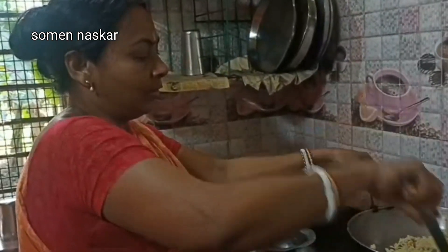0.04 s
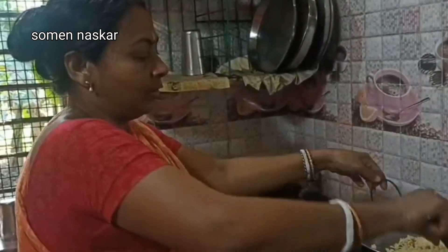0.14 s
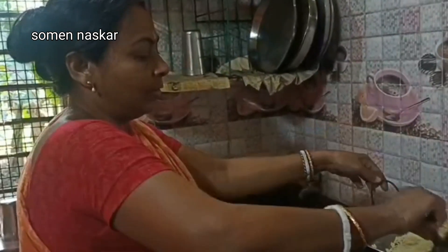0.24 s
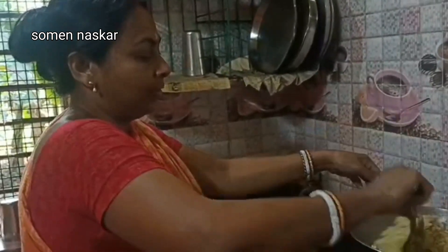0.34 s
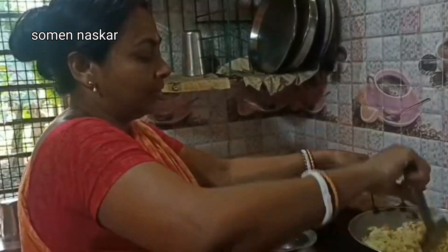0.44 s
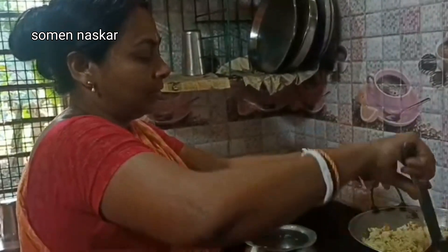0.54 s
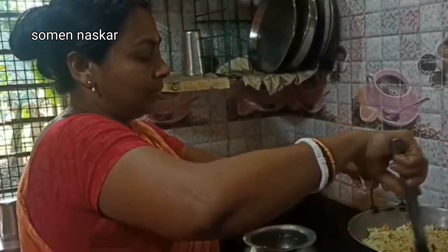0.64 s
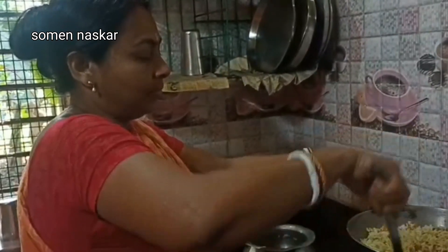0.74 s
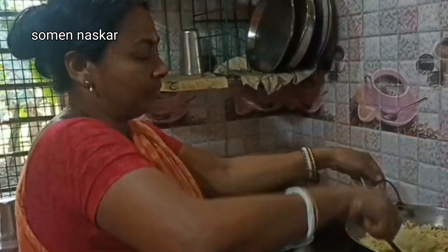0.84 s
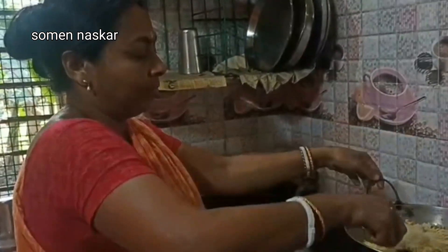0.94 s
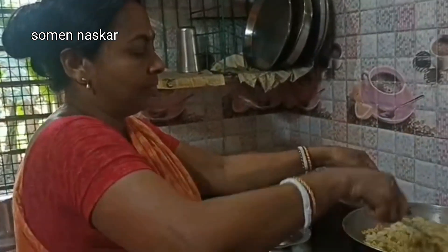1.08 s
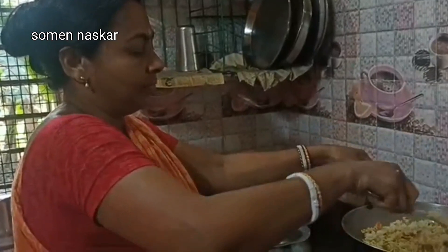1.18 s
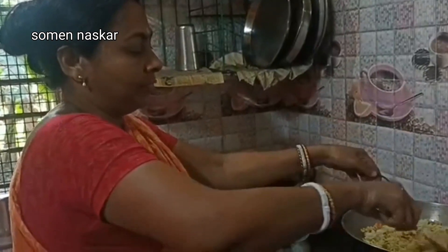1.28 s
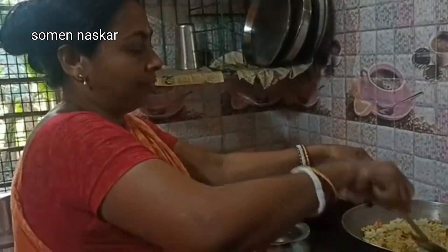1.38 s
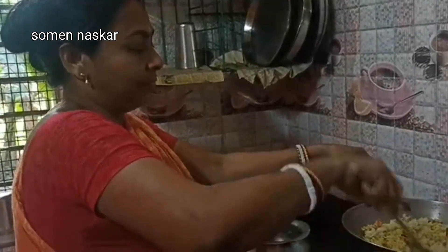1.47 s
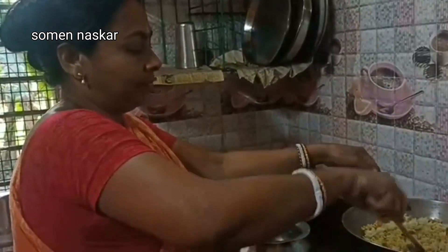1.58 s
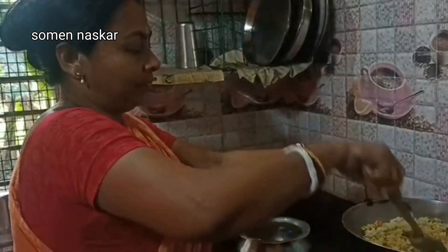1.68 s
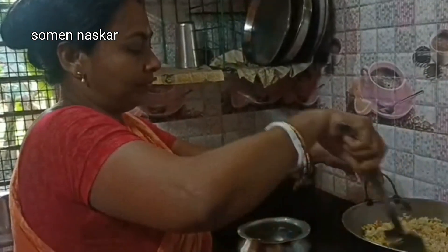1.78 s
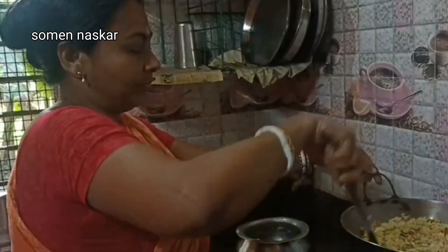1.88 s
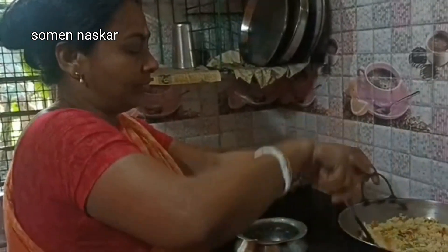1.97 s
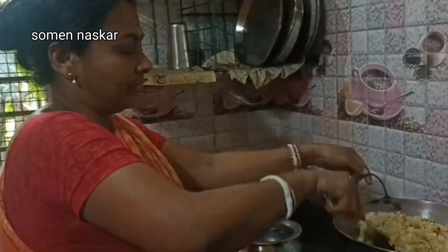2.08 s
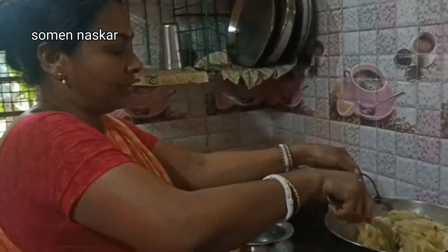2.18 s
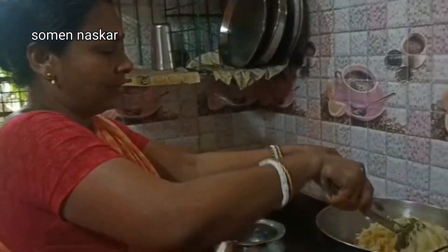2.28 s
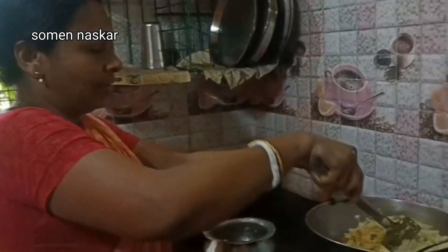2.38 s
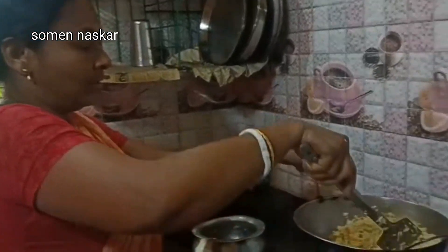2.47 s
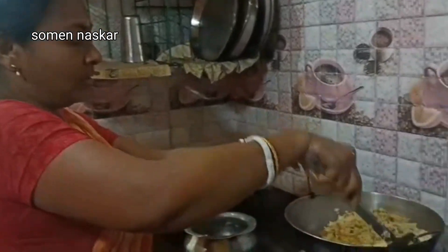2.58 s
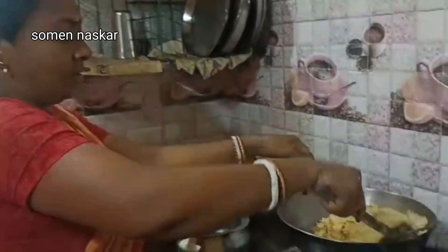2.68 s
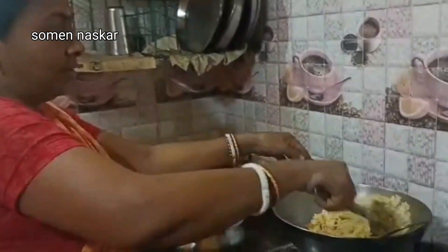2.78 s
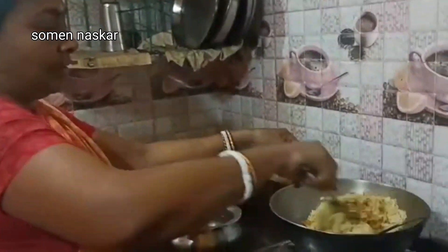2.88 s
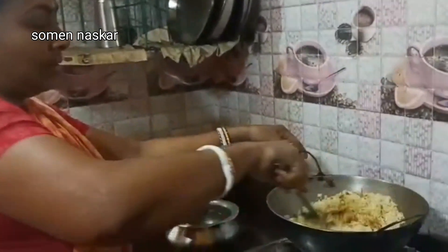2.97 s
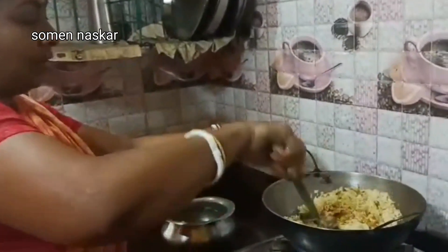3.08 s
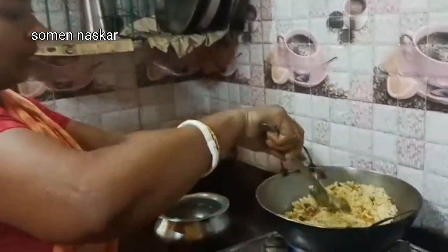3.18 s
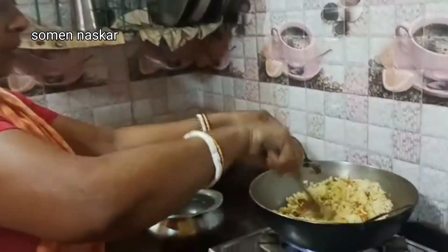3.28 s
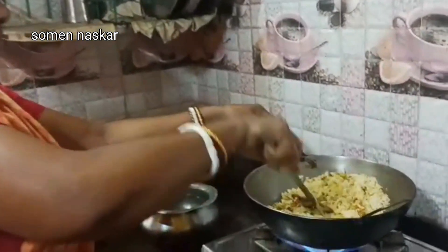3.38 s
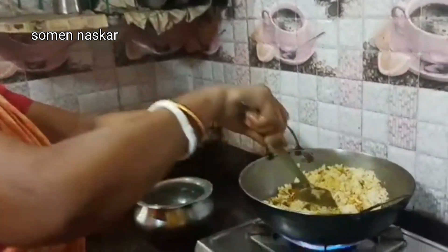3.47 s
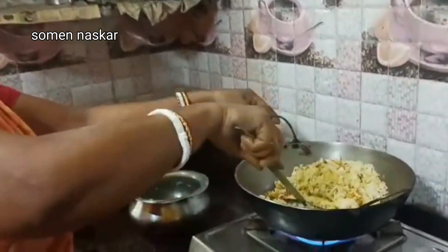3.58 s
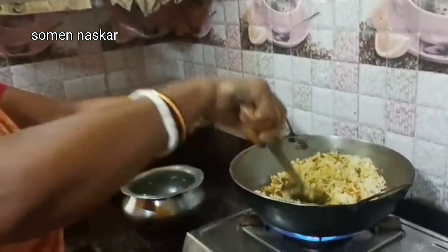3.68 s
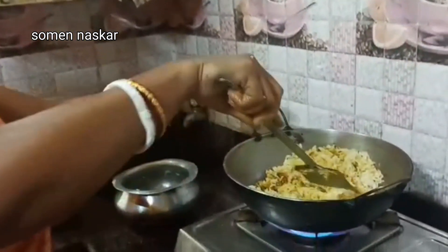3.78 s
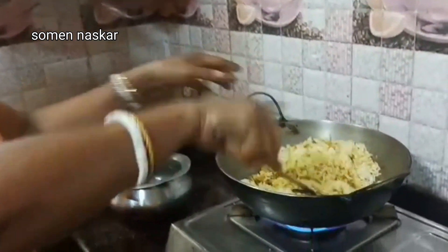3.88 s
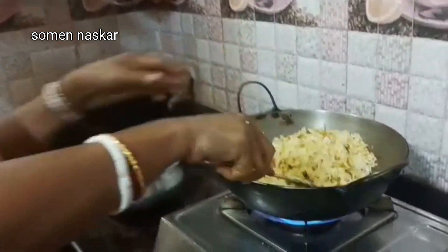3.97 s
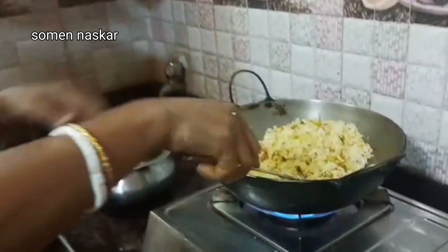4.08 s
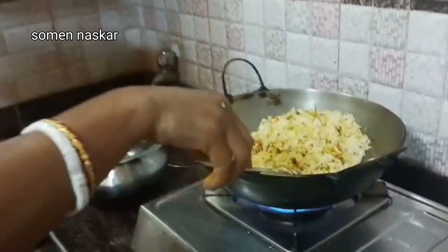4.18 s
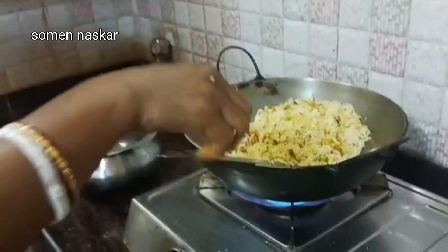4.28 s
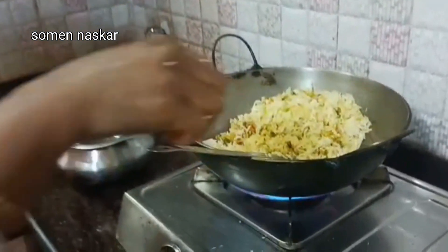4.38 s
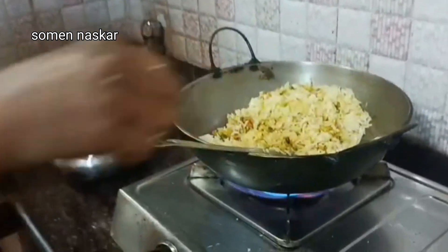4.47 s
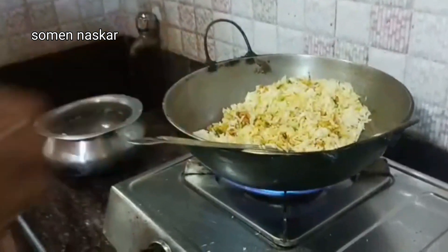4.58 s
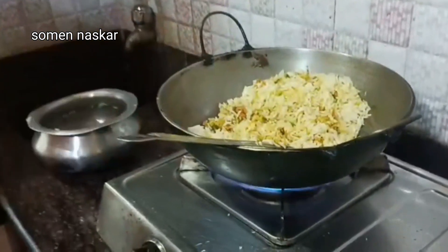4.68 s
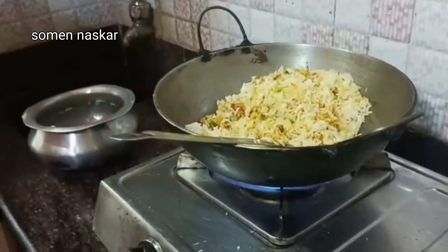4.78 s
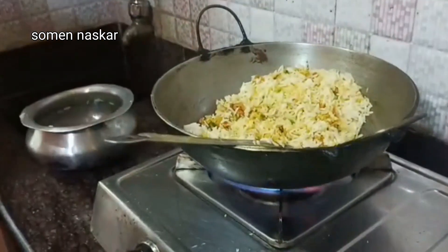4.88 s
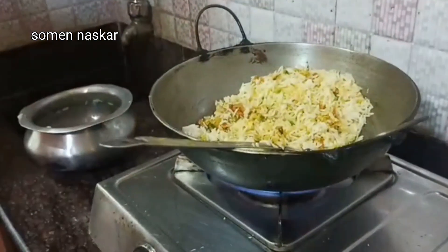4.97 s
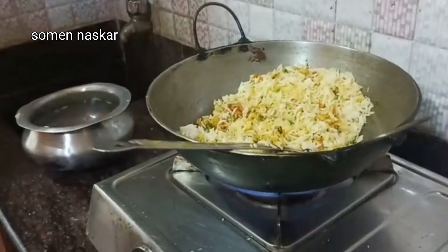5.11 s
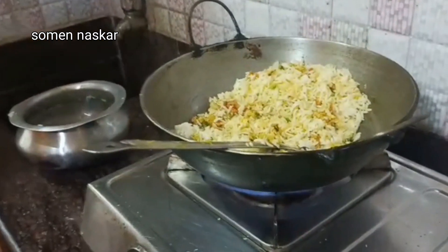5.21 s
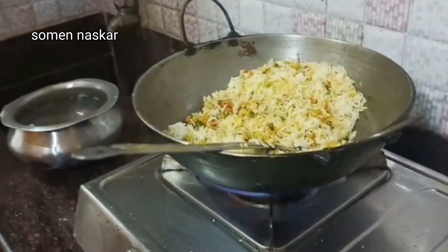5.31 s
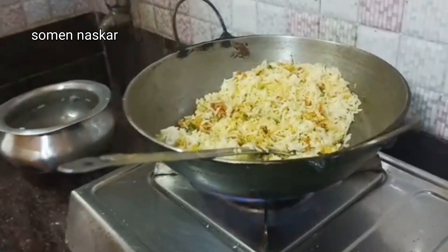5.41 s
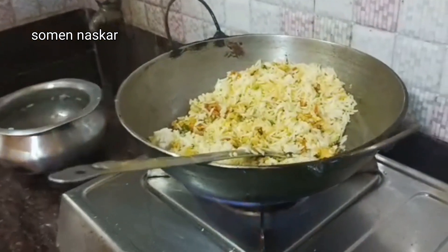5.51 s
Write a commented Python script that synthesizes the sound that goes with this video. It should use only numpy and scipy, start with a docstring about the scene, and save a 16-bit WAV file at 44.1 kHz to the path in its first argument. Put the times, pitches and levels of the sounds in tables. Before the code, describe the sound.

In a small tiled kitchen, moist rice fries with a dense, bright sizzle that swells at each turn. A steel spatula hisses along the wok and chatters against it, with the hardest clanks around the middle and a last one after four seconds. Then the sizzle thins and sputters, with sharp steam pops over a soft gas flame. One nearby microphone, mono, with short hard echoes.

```python
"""A small tiled kitchen: rice fries in a metal wok on a gas burner, over a soft flame and low hums.
The sizzle is dense random clicks, shaped by how much water meets the metal; each turn freshens it.
A steel spatula ploughs through the rice and chatters on the wok: random impacts ringing metal modes.
When the stirring stops, the sizzle thins out and sputters. Bursts of noise make the steam pops, and
narrow bands of noise make the faint steam whistles. Echoes and a short tail surround wok and spatula."""
import sys
import numpy as np
from scipy import signal
from scipy.io import wavfile
from scipy.ndimage import uniform_filter1d, minimum_filter1d

SR = 44100
rng = np.random.default_rng(int(sys.argv[2]) if len(sys.argv) > 2 else 0)


def unload_wav(signal):
    """Save mono or channel-first audio to the path in sys.argv[1] as 16-bit WAV at rate SR, clipped to [-1, 1]."""
    wavfile.write(
        sys.argv[1],
        SR,
        np.round(np.clip(np.atleast_2d(signal).T, -1, 1) * 32767).astype(np.int16),
    )


N = 244573
TIME = np.arange(N) / SR
CONTACT_TIME = np.arange(SR // 3) / SR  # time within one knock or stroke


def from_db(db):
    """Decibels to gain."""
    return 10 ** (np.asarray(db) / 20)


def evened(x):
    """Scales to an rms of 1."""
    return x / np.sqrt(np.mean(x ** 2) + 1e-20)


def unit(x):
    """Scales to an energy of 1."""
    return x / (np.linalg.norm(x) + 1e-12)


def at_level(x, db, length):
    """Gives a contact the energy of a sound at this rms level lasting this many seconds."""
    return from_db(db) * unit(x) * np.sqrt(length * SR)


def read(points, hz):
    """Reads a table on a log-frequency axis."""
    f, value = np.transpose(points)
    return np.interp(np.log(hz + 1), np.log(f + 1), value)


def add(mix, s, sound):
    """Mixes a sound in at time s."""
    part = mix[max(round(s * SR), 0):][:len(sound)]
    part += sound[:len(part)]


def colour(x, points, size=4096):
    """Causal filter with the given spectral shape, so that clicks keep their sharp fronts."""
    log_gain = np.log(from_db(read(points, abs(np.fft.fftfreq(size, 1 / SR)))))
    minimum_phase = np.exp(np.conj(signal.hilbert(log_gain)))
    taps = np.fft.ifft(minimum_phase).real[:size // 2]
    return signal.oaconvolve(x, unit(taps))[:len(x)]


def slow_noise(size):
    """Random drift of rms 1, smoothed over this many samples."""
    return evened(uniform_filter1d(rng.standard_normal(N), size=size))


def clicks(n, per_s, spread_db):
    """Random clicks of either sign: many small, a few large."""
    height = from_db(spread_db * np.minimum(rng.exponential(1, n), 3.5))
    return height * rng.choice([-1, 1], n) * (rng.random(n) < per_s / SR)


def resonate(x, hz, width):
    """A resonance at hz with steep skirts: the band is shifted to 0 Hz, smoothed twice and shifted back."""
    turn = np.exp(2j * np.pi * np.cumsum(hz * np.ones(len(x))) / SR)
    r = np.exp(-np.pi * width / SR)
    smoothed = signal.lfilter([(1 - r) ** 2], [1, -2 * r, r * r], x / turn + 1e-18)
    return (turn * smoothed).real


def breathy_tones(rows, width):
    """Narrow bands of noise that swell and fade."""
    out = np.zeros(N)
    for s, length, hz, db in rows:
        settled = resonate(rng.standard_normal(SR), hz, width)[-int(length * SR):]
        tone = evened(settled)
        add(out, s, from_db(db) * tone * signal.windows.tukey(len(tone)))
    return out


def burner():
    """The gas flame is mostly low noise whose level flutters softly."""
    # colour of the flame: (frequency [Hz], relative level [dB])
    flame_colour = [(20, -25), (45, 0), (90, -6), (125, 3.5), (170, 6), (240, 6.5), (350, 4.5), (600, 2),
                    (1200, -4.5), (3000, -21)]
    flame = evened(colour(rng.standard_normal(N), flame_colour))
    flutter = slow_noise(size=3000)
    return flame * from_db(-49.5 + 1.44 * flutter)


def hums():
    """A narrow band of noise gives a wavering mains hum; other faint hums come and go."""
    # passing low hums: (start [s], length [s], frequency [Hz], level [dB])
    passing_hums = [(0.72, 0.73, 141, -52.5), (1.85, 0.59, 212.7, -51), (4.28, 0.28, 161.7, -51),
                    (4.52, 0.25, 98.6, -52)]
    steady = evened(resonate(rng.standard_normal(N), hz=97.7, width=11))
    return from_db(-57.5) * steady + breathy_tones(passing_hums, width=10.5)


def kitchen(x, moves_per_s, tail_db=-5.5, gap=.009):
    """Direct sound, hard echoes from the tiled corner, and a short tail; both shift as the source moves."""
    # reflections off the tiled walls: (delay [s], gain)
    echoes = [(.0088, 0.17), (0.012, 0.11), (.0123, 0.21), (.0192, 0.1)]
    # decay of the tail: (frequency [Hz], time to fall 60 dB [s])
    decay_times = [(150, .42), (600, .34), (3000, .29), (8000, .25), (15000, .2)]
    out = x.copy()
    for delay, gain in echoes:
        drift = .0003 * np.sin(2 * np.pi * (rng.uniform(.8, 2) * TIME + rng.random()))  # s
        source_index = np.round((TIME - delay - drift) * SR).astype(int)
        out += gain * x[np.maximum(source_index, 0)] * (TIME > delay)
    # four tails of sparse reflections take turns
    for angle in np.linspace(0, np.pi, 4, endpoint=False):
        hz, t, z = signal.stft(clicks(SR // 2, per_s=5500, spread_db=3.5), SR, nperseg=256)
        decay = from_db(-60 * t / read(decay_times, hz)[:, None])
        tail = signal.istft(z * decay, SR, nperseg=256)[1]
        share = np.cos(np.pi * moves_per_s * TIME + angle) ** 3 / np.sqrt(1.25)
        add(out, gap, from_db(tail_db) * signal.oaconvolve(x * share, unit(tail)))
    return out / np.sqrt(1 + sum(gain ** 2 for _, gain in echoes) + from_db(tail_db) ** 2)


def whistles():
    """Thin jets of steam from under the rice sing faintly for a moment."""
    # steam jets: (start [s], length [s], frequency [Hz], level [dB])
    jets = [(4.863, 0.24, 3310, -40), (4.887, 0.088, 13700, -26)]
    return breathy_tones(jets, width=190)


def pops():
    """Trapped steam bursts with a snap; the flung droplets fizz briefly on the metal."""
    # bursting pockets of steam: (time [s], snap energy before colouring [dB], snap decay time [s])
    bursting_pockets = [(3.905, 15.5, .0009), (4.811, 18, 0.0011), (4.996, 3.5, 0.00055),
                        (5.052, 3.5, 0.0024), (5.1159, 7.5, 0.00079), (5.3661, 5.5, 0.0044),
                        (5.377, -9.5, .003), (5.4663, 4, 0.0022), (5.5094, 3, 0.0018)]
    # colour of snap and fizz: (frequency [Hz], relative level [dB])
    pop_colour = [(60, -42), (200, -25), (900, -11), (1800, -3.5), (3500, 5.5), (7000, 12), (8500, 6.5),
                  (10200, -6.5), (13300, 11.5), (15500, -23)]
    out, t = np.zeros(N), np.arange(SR // 5) / SR
    for s, db, length in bursting_pockets:
        snap = unit(rng.standard_normal(len(t)) * np.exp(-t / length))
        fizz = unit(clicks(len(t), per_s=7300, spread_db=1.0) * t * np.exp(-t / 0.011))
        add(out, s, from_db(db) * (snap + 0.7 * fizz))
    return colour(out, pop_colour)


def wok(force, modes_db):
    """A force rings the main modes over a dense clatter; where it lands shifts their weights and pitches."""
    # wok and spatula ringing together, damped by the rice:
    # (nominal frequency [Hz], nominal relative level [dB], time to fall 60 dB [s])
    modes = [(243, -9.5, 0.21), (258.5, -1.5, 0.11), (336, -5, 0.088), (416.6, -7, 0.28), (418, 2.5, 0.05),
             (514, 7, 0.12), (540, 7.5, 0.022), (584, -9, 0.059), (1018, -7, .1), (1410, -3, .08),
             (1457, -1, .11), (1680, -6, .09), (1860, -6, .08), (2000, -7, .08), (2640, -3, .05),
             (2905, 0, .1), (3070, 0, .08), (3165, -1, .06), (3388, 0, .08), (3800, -2, .06),
             (4170, 11, 0.045), (4240, -10, 0.026), (5220, 15, 0.0077), (5720, -50, 0.027),
             (6230, 11, 0.042), (6470, 16, 0.033), (7010, 18, 0.031), (7750, 2, 0.029), (7640, 0, 0.02),
             (7630, 23.5, 0.0096)]
    # colour of the clatter: (frequency [Hz], relative level [dB])
    contact_colour = [(30, -19), (100, -15), (240, -1.5), (330, -1.5), (470, 2), (590, 5), (800, -13),
                      (1150, -8.5), (1480, -3.5), (2200, -2), (3000, -0.5), (7200, 3), (10300, -6.5),
                      (14000, -3)]
    t = np.arange(len(force)) / SR
    place, phases = rng.standard_normal((len(modes), 2)), rng.random(len(modes))
    ring = np.zeros(len(t))
    for (hz, db, t60), (weight, shift), phase in zip(modes, place, phases):
        decay = from_db(db + 1.5 * weight - 60 * t / t60)
        ring += decay * np.sin(2 * np.pi * (hz * (1 + .008 * shift) * t + phase))
    clatter = colour(force, contact_colour)
    return clatter + from_db(modes_db) * signal.fftconvolve(force, unit(ring))[:len(t)]


def registers(x, bottom_hz=130, bowl_hz=850, blade_hz=4900):
    """Splits into the bowl's boom, its middle (clang or rasp) and the blade's top (clink or hiss)."""
    bands = [([bottom_hz, bowl_hz], "band"), ([bowl_hz, blade_hz], "band"), (blade_hz, "high")]
    return [signal.sosfilt(signal.butter(4, hz, kind, fs=SR, output="sos"), x) for hz, kind in bands]


def strokes():
    """The edge sticks and slips down the wall: bright at first, deeper as it reaches the bottom."""
    # spatula strokes through the rice: (start [s], length [s], blade hiss level [dB],
    # wok boom level [dB], squeal frequency [Hz], squeal level [dB])
    spatula_strokes = [(0.157, 0.3, -22.5, -51.5, 3660, -36), (0.92, 0.2, -20, -43, 4950, -22.5),
                       (1.427, 0.21, -24, -54, 6100, -36), (1.656, 0.037, -23, -51, 3300, -30),
                       (2.108, 0.18, -16.5, -45, 3920, -28), (2.726, 0.17, -21, -43.5, 5940, -23.5),
                       (3.02, 0.24, -26, -63, 7100, -43), (3.695, 0.16, -21, -49, 4570, -26.5),
                       (4.004, 0.15, -25, -47, 6500, -46), (4.665, 0.08, -27.5, -60, 6840, -36)]
    rasp_db, buzz_db = -13, -14.5  # bowl rasp and shaft buzz, relative to the hiss
    out, t = np.zeros(N), CONTACT_TIME
    for s, length, hiss_db, boom_db, squeal_hz, squeal_db in spatula_strokes:
        travel = np.minimum(t / length, 1)
        pressure = np.minimum(travel / 0.12, 1) * np.sqrt(1 - travel)
        force = clicks(len(t), per_s=3200, spread_db=2.0) * pressure
        boom, rasp, hiss = registers(wok(force, modes_db=-3))
        depth = from_db(7.9 * travel)
        squeal = resonate(force, squeal_hz, width=750)
        buzz = resonate(force, hz=2800, width=800)
        parts = hiss / depth, boom * depth, rasp * depth, squeal, buzz
        levels_db = hiss_db, boom_db, hiss_db + rasp_db, squeal_db, hiss_db + buzz_db
        for part, db in zip(parts, levels_db):
            add(out, s, at_level(part, db, length))
    return out


def knocks():
    """The blade lands, then chatters in a dying run of impacts; the shaft's ring depends on the grip."""
    # spatula knocks: (time [s], wok boom level [dB], blade clink level [dB], chatter length [s],
    # shaft ring frequency [Hz], blade ring level [dB])
    spatula_knocks = [(0.08, -37.5, -18.5, 0.03, 4400, -21), (1.524, -60, -15, 0.0094, 4140, -28),
                      (1.695, -30, -17, 0.086, 2880, -18), (2.051, -40, -15, 0.053, 5660, -15),
                      (3.466, -27.5, -11.5, 0.032, 4430, -26), (3.514, -31, -16.5, 0.055, 4230, -43),
                      (3.734, -26.5, -28, 0.031, 2880, -35), (4.074, -35, -16.5, 0.081, 2860, -37),
                      (4.308, -35.5, -18, 0.051, 2870, -16.5)]
    clang_db, shaft_db = 0.85, -2.5  # relative to the midpoint of boom and clink
    out, t = np.zeros(N), CONTACT_TIME
    for s, boom_db, clink_db, length, shaft_hz, blade_db in spatula_knocks:
        chatter = clicks(len(t), per_s=3500, spread_db=2.5) * np.exp(-(t / length) ** 2)
        blow = rng.standard_normal(len(t)) * np.exp(-t / 0.0033)
        force = unit(chatter) + 0.38 * unit(blow)
        boom, clang, clink = registers(wok(force, modes_db=-3))
        shaft = resonate(force, shaft_hz, width=480)
        blade = resonate(force, hz=6460, width=620)
        parts = boom, clang, clink, shaft, blade
        middle_db = (boom_db + clink_db) / 2
        levels_db = boom_db, middle_db + clang_db, clink_db, middle_db + shaft_db, blade_db
        for part, db in zip(parts, levels_db):
            add(out, s, at_level(part, db, length))
    return out


def moisture_db():
    """How much water meets the hot metal: a drying simmer plus a swell for every turn of the rice."""
    # turns that spill moist rice onto hot metal: (start [s], time until boiling away [s], fresh sizzle [dB])
    turns = [(-0.13, 0.13, -25.5), (0.078, 0.54, -23), (0.85, 0.32, -20), (1.389, 0.15, -21),
             (2.08, 0.37, -21.5), (2.712, 0.21, -22), (3.0, 0.13, -20), (3.938, 0.25, -26.5)]
    simmer_db, rest_s, drying_db_per_s = -28, 4.29, 4  # the simmer dries out from rest_s on
    swell_s, boil_off_db_per_s = 0.11, 39.5
    power = from_db(simmer_db - drying_db_per_s * np.maximum(TIME - rest_s, 0)) ** 2
    for s, length, db in turns:
        swell = np.clip((TIME - s) / swell_s, 0, 1)
        boil_off_db = boil_off_db_per_s * np.maximum(TIME - s - length, 0)
        power = power + (swell * from_db(db - boil_off_db)) ** 2
    return 10 * np.log10(power)


def sizzle():
    """Water flashes off hot metal in tiny bursts; wet metal gives more and louder ones, dry metal sputters."""
    # colour of the fine spray: (frequency [Hz], relative level [dB])
    spray_colour = [(3000, -38), (5500, -3.5), (7200, 0), (8200, -1.5), (9500, -7), (10500, -11),
                    (12000, -1.5), (13600, 2), (14600, -2), (15600, -3.5)]
    # colour of the coarse bubbles: (frequency [Hz], relative level [dB])
    bubble_colour = [(200, -27.5), (600, -16.5), (1100, -17), (1750, -9.5), (2200, -10), (2800, -4.5),
                     (5000, 0), (6200, -1), (7200, 4.5), (8200, -2), (10000, -14.5), (15500, 0)]
    wet_db = moisture_db()
    dry_db = wet_db.max() - wet_db
    wetness = from_db(-1.3 * dry_db)  # share of the fullest burst rate
    sputter = from_db(0.08 * dry_db * slow_noise(size=900))  # dB of unevenness per dB of dryness

    def bursts(per_s, spread_db, clump_db):
        """Clumped clicks; the root of wetness makes up the level lost to a lower rate."""
        clumps = slow_noise(size=110)
        train = clicks(N, per_s * wetness, spread_db)
        return evened(train * from_db(clump_db * clumps) / np.sqrt(wetness))

    spray = colour(bursts(per_s=14000, spread_db=1.9, clump_db=-0.4), spray_colour)
    bubbles = colour(bursts(per_s=14000, spread_db=0.5, clump_db=1.5), bubble_colour)
    spray_gain = from_db(4 + wet_db)
    bubble_gain = from_db(-3.5 + 0.69 * wet_db)  # bubbles follow the moisture less than the spray
    return sputter * (spray * spray_gain + bubbles * bubble_gain)


def scene():
    """Bubbles burst all over the wok, the spatula moves slowly; one microphone hears it all."""
    surge = slow_noise(size=1500)  # steam leaves the rice in small puffs
    stirring = kitchen(knocks() + strokes() + whistles(), moves_per_s=6)
    frying = kitchen(sizzle() * from_db(.45 * surge) + pops(), moves_per_s=37)
    mono = burner() + hums() + stirring + frying
    return np.array([mono, mono])


def record(dry):
    """A fast limiter pulls the sharpest peaks down towards full scale; then the treble is cut off."""
    allowed = 1 / np.maximum(abs(dry).max(0), 1)
    gain = uniform_filter1d(minimum_filter1d(allowed, size=41), size=41)
    low_pass = signal.firwin(601, 15650, window=("kaiser", 8), fs=SR)  # cutoff in Hz
    return signal.oaconvolve(dry * gain, low_pass[None], "same")


dry = scene()
out = record(dry)
unload_wav(out)
```